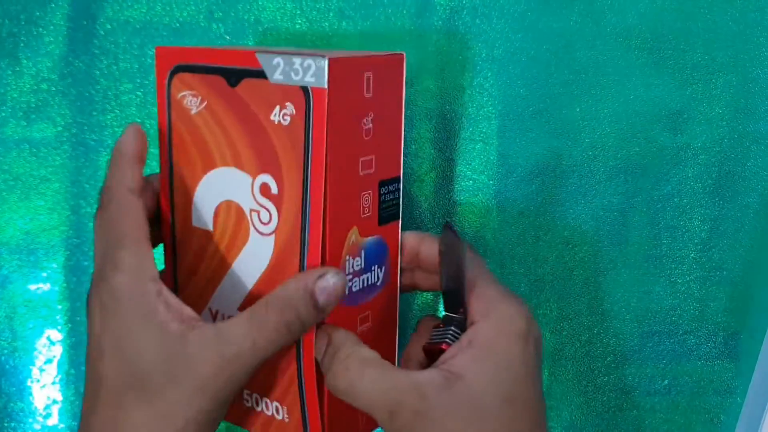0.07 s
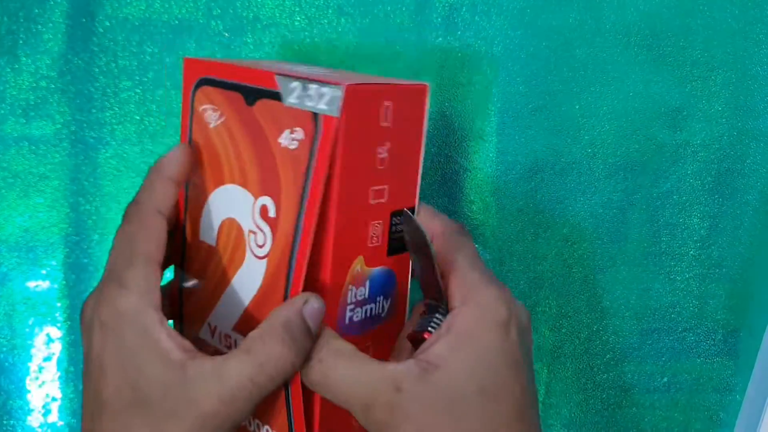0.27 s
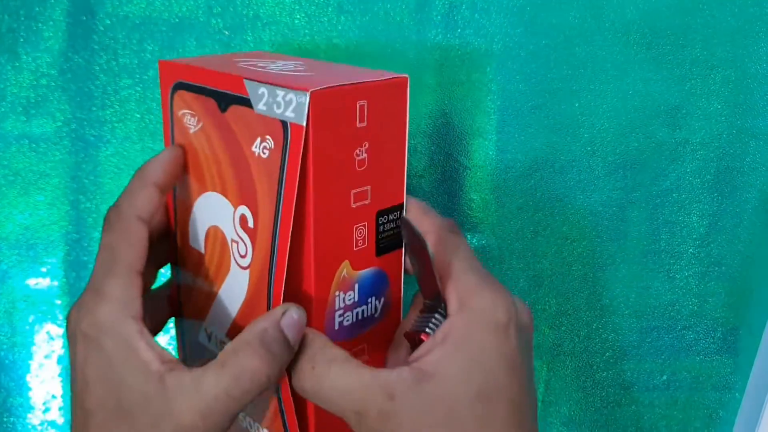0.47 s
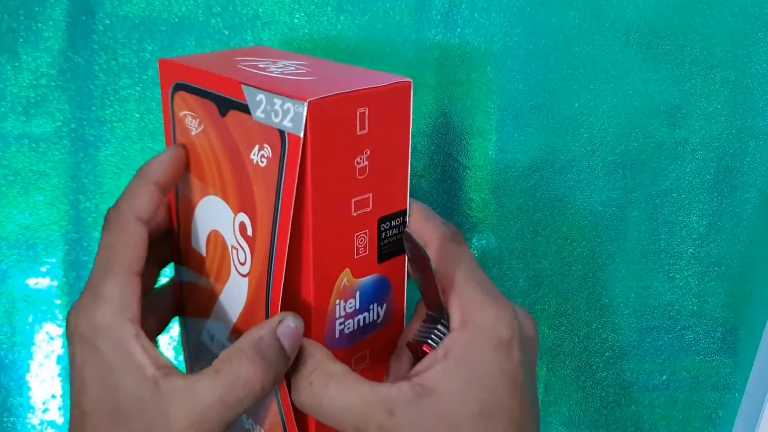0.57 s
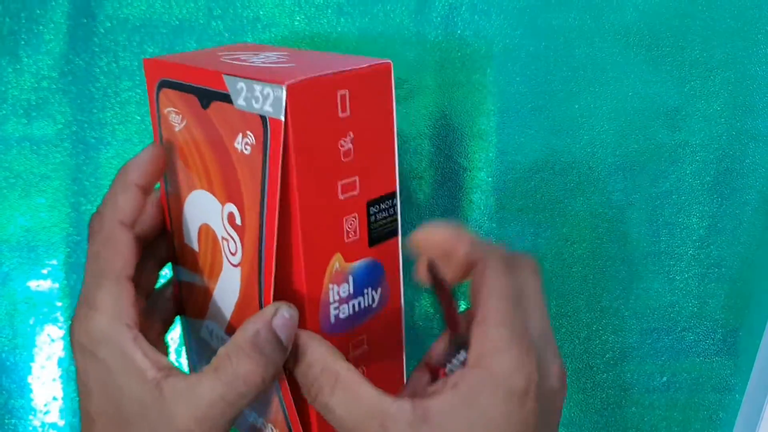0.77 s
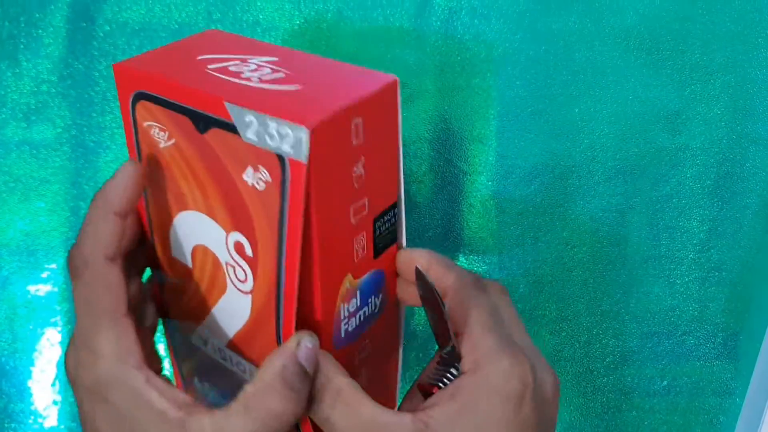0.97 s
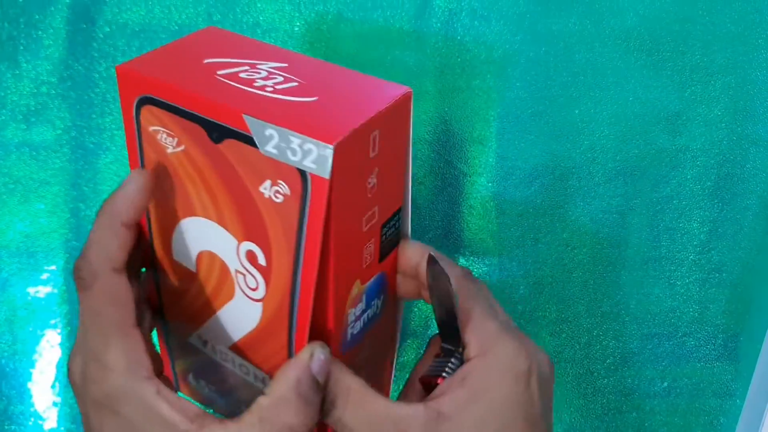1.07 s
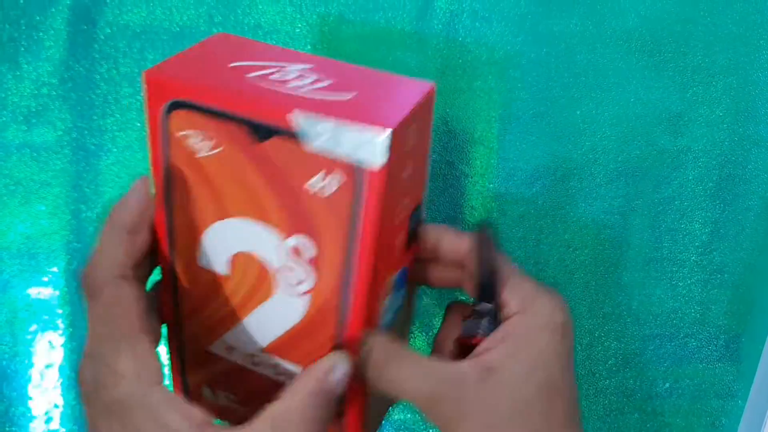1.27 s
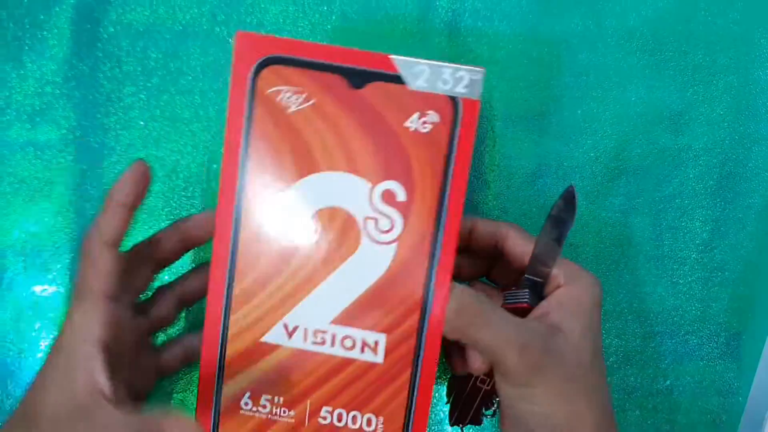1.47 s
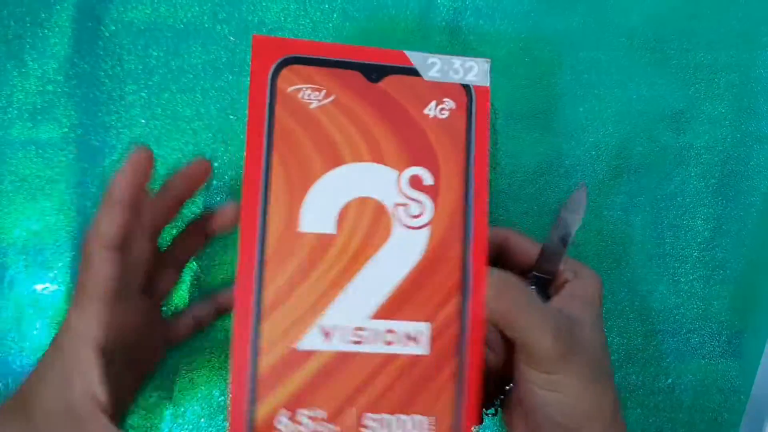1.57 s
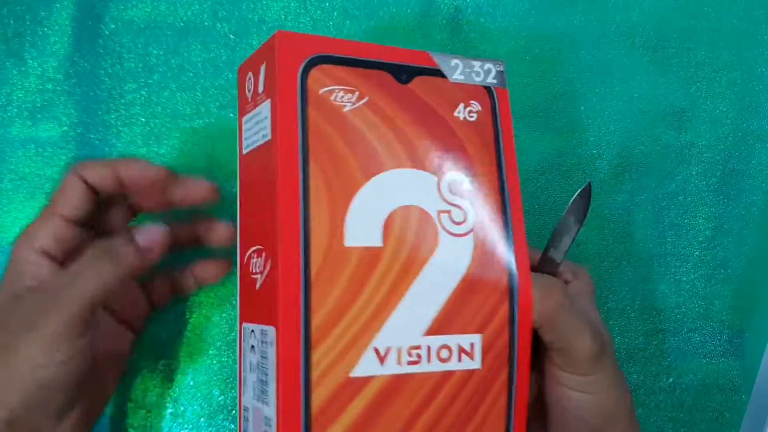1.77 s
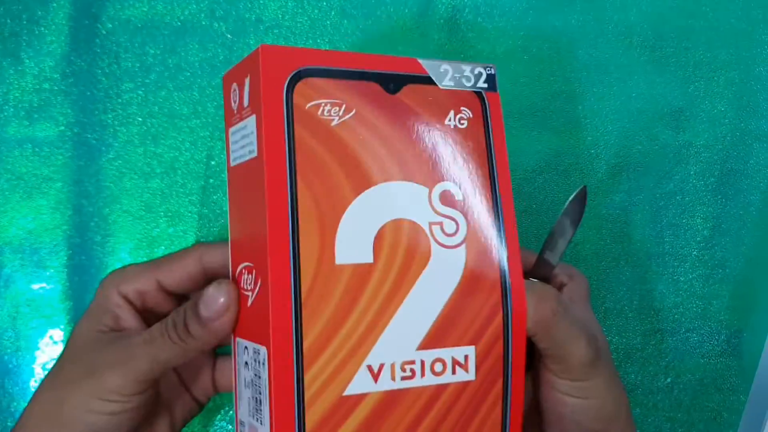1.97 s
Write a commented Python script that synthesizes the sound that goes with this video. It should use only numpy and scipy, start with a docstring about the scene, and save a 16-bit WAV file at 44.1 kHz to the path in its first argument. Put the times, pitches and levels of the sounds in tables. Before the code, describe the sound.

A light cardboard box is handled up close, with dull hollow taps, small snaps and sliding fingers

```python
"""Hands turning a glossy box

A small cardboard box is turned on a table in a quiet room, close to a phone with two microphones.
Fingers thump the hollow box: soft pushes ring its modes. Its stiff edges snap and tick: short noise
bursts with a ring. Skin slides over the coating: dense tiny slips, heard partly through the walls.
The room answers with a short diffuse tail over its own hush of steady noise.
"""
import sys
import numpy as np
from scipy import signal
from scipy.fft import rfft, irfft
from scipy.io import wavfile
from scipy.ndimage import uniform_filter1d

SR = 44100
rng = np.random.default_rng(int(sys.argv[2]) if len(sys.argv) > 2 else 0)


def boost(x):
    """Linear amplitude factor 10**(x/20) for a level x in decibels (scalar or array-like)."""
    u = np.asarray(x, float) / 20
    return 10 ** u


def materialize(psi):
    """Save the field psi as 16-bit PCM at rate SR to the path in sys.argv[1].

    A 1-D psi becomes a single channel; in a 2-D psi each row is a channel.
    """
    bounded = np.clip(np.atleast_2d(psi).T, -1, 1)
    quanta = np.round(bounded * 32767).astype(np.int16)
    wavfile.write(sys.argv[1], SR, quanta)


N = 89082
LEAD_IN_S = 0.05  # played before time 0 and cut off, so sounds may already be under way
M = N + int(LEAD_IN_S * SR)


def on_log(table, hz):
    """Reads (frequency [Hz], value) rows on a log-frequency axis."""
    table = np.array(table, float)
    return np.interp(np.log(np.maximum(hz, 1.0)), np.log(table[:, 0]), table[:, 1])


def unit(x):
    """Scales x to an rms of 1."""
    return x / np.sqrt(np.mean(x ** 2))


def band(x, hz, width_hz):
    """Resonance with gain 1 at the centre."""
    return signal.lfilter(*signal.iirpeak(min(hz, 0.45 * SR), hz / width_hz, fs=SR), x)


def band_twice(x, hz, width_hz):
    """Two equal resonances in a row, for steeper skirts."""
    return band(band(x, hz, width_hz), hz, width_hz)


def add(track, s, x):
    """Mixes x into the track at s seconds."""
    i = int((s + LEAD_IN_S) * SR)
    x = x[:M - i]
    track[i:i + len(x)] += x


def pair(a, b, likeness):
    """Mixes two spectra into a left and a right with the given likeness."""
    c = np.clip(likeness, 0, 1)
    shared, opposed = np.sqrt(1 + c) * a, np.sqrt(1 - c) * b
    return np.array([shared + opposed, shared - opposed]) / np.sqrt(2)


# Finger thumps on the box:
# (time [s], peak level at the box [dB], frequency favoured by the spot [Hz], push length [ms])
FINGER_THUMPS = [(-.012, -32, 357, 0.46), (-.004, -31, 1150, 0.076), (.013, -34, 400, 1.8),
                 (0.211, -45, 293, 0.44), (0.323, -45.5, 190, 3.2), (0.368, -40, 148, 1.74),
                 (.3915, -28, 640, 0.13), (.392, -35.5, 320, 0.45), (0.396, -42, 100, 5.4),
                 (0.437, -67, 100, 3.8), (0.454, -47.5, 100, 4.7), (0.726, -42, 290, 0.41),
                 (0.926, -35.5, 369, 0.49), (0.9265, -46, 850, 0.33), (.97, -31.5, 321, 1.3),
                 (.9705, -41, 850, .4), (0.9759, -42.5, 362, 0.67), (1.237, -42, 330, 2.86),
                 (1.33, -39, 158, 0.2), (1.33, -40, 670, 0.061), (1.642, -56, 1130, 0.21),
                 (1.759, -42, 374, 0.48), (1.998, -40.5, 290, 0.48)]
# Modes of the hollow box: (frequency [Hz], level before scatter [dB], 60 dB decay time [s])
BOX_MODES = [(88.2, 8.5, 0.11), (155, 2, 0.062), (225.2, 11.5, 0.045), (290, 4, 0.061), (349, 2.5, 0.083),
             (380, -27, 0.021), (601, -9.5, 0.27), (640, 6.5, 0.027), (850, 4.5, 0.026),
             (1094, -12.5, 0.11), (1430, -9.5, 0.11), (1497, -18, 0.47), (1807, 0.5, 0.045)]


def thumps():
    """A soft push rings the modes near in pitch to the one favoured by the spot that is hit."""
    spot_octaves, far_mode_db, scatter_db = 0.36, -21, 1.5
    sag_per_s = 0.304  # share by which the ring's pitch sinks as the wall relaxes
    build_up_cycles = 0.42  # a mode needs a moment to take up the blow
    out, t = np.zeros(M), np.arange(SR // 4) / SR
    hz, db, t60 = np.array(BOX_MODES, float).T[:, :, None]
    modes = np.sin(2 * np.pi * hz * t * (1 - sag_per_s * t / 2))
    modes = modes * 1000.0 ** (-t / t60) * (1 - np.exp(-hz * t / build_up_cycles))
    for s, peak_db, spot_hz, push_ms in FINGER_THUMPS:
        share = np.exp(-0.5 * (np.log2(hz / spot_hz) / spot_octaves) ** 2) + boost(far_mode_db)
        mode_db = db + scatter_db * rng.standard_normal(hz.shape)
        ring = (share * boost(mode_db) * modes).sum(0)
        push = np.sin(np.pi * np.clip(t[:SR // 100] * 1000 / push_ms, 0, 1)) ** 2
        blow = signal.fftconvolve(ring, -np.diff(push))  # the wall's acceleration is what radiates
        add(out, s, blow * boost(peak_db) / np.abs(blow).max())
    return out


# Snaps and ticks of the edges: (time [s], snap level before the envelope's rms [dB],
# envelope time scale [ms], tick level over the snap [dB], ring level over the snap [dB])
EDGE_SNAPS = [(-.012, -36, 27.4, -20, -12), (.295, -54.5, 8, 1, 4), (.375, -51.5, 5.3, -25, -20),
              (.3915, -41.5, 3.5, -1.5, 0), (0.43, -64.5, 4.6, 13, -26), (0.727, -64, 14, -9, -14),
              (0.969, -56, 6.2, -7, 4), (1.008, -66, 5.7, 17.5, -11), (1.153, -66, 2.8, 10, -5),
              (1.218, -62.5, 9, -8, -3), (1.233, -57, 24, -37, 4), (1.244, -52.5, 16.7, 2, -3),
              (1.325, -38.5, 20.8, -6, -0.5), (1.408, -69, 13, -25, 16.5), (1.982, -62, 16.1, -20, 11.5),
              (2, -64, 2.16, -36, 20)]
# Resonances that ring after a snap: (frequency [Hz], width of one filter pass [Hz], level within the ring [dB])
RING_MODES = [(2169, 310, 1.5), (1807, 97, -10), (3200, 760, -36)]


def snap_ring(jolt, burst):
    """A ring set off by one jolt, with a noisy rasp 5 dB below it."""
    ring = 0
    for hz, width_hz, db in RING_MODES:
        clean = unit(band_twice(jolt, hz, width_hz))
        rasp = boost(-5) * unit(band(burst, hz, width_hz))
        ring = ring + boost(db) * (clean + rasp)
    return ring


def snaps():
    """A short noise burst gives a broad snap and a treble tick; a jolt in it sets off a ring."""
    out, t = np.zeros(M), np.arange(SR // 20) / SR
    for s, db, ms, tick_db, ring_db in EDGE_SNAPS:
        u = t * 1000 / ms
        shape = u ** 2 * np.exp(-5.5 * u)
        shape = shape / shape.max()
        burst = rng.standard_normal(len(t)) * shape
        jolt = np.zeros(len(t))
        jolt[np.argmax(shape) // 2] = 1  # halfway up to the burst's peak
        snap = unit(band(burst, 2310, 5400))  # centre and width in Hz
        tick = unit(band_twice(burst, 10800, 9000))
        parts = snap + boost(tick_db) * tick + boost(ring_db) * snap_ring(jolt, burst)
        add(out, s, boost(db) * np.sqrt(np.mean(shape ** 2)) * parts)
    return out


# Skin sliding on the coating: (middle [s], length [s], level before the swell [dB],
# centre frequency [Hz], level through the box walls over the direct slide [dB])
SKIN_SLIDES = [(.0, 0.46, -63, 3400, 16.5), (0.214, 0.11, -69, 7740, 8.5), (0.299, 0.13, -56.5, 6900, 1.5),
               (0.411, 0.3, -70.5, 6200, 13), (0.769, 0.12, -60, 10500, -0.5),
               (0.986, 0.19, -64.5, 5000, 9), (1.058, 0.1, -70, 8500, 13), (1.123, 0.11, -62.5, 4530, 5.5),
               (1.248, 0.15, -72, 7200, 15.5), (1.364, 0.18, -77.5, 3200, 27),
               (1.719, 0.16, -72, 4900, -23), (2.015, 0.095, -69.5, 4350, 18)]


def slip_grains():
    """Sparse random clicks of uneven strength, under a grip that wavers."""
    grains_per_s, spread_db = 6000, 2.2
    grip_per_s, grip_db = 120, 1.8  # uneven grip of the sliding skin
    clicks = (rng.random(M) < grains_per_s / SR) * rng.standard_normal(M)
    clicks = clicks * boost(spread_db * rng.exponential(1, M))
    hold = int(SR / grip_per_s)
    steps = np.repeat(rng.standard_normal(M // hold + 2), hold)[:M]
    grip = uniform_filter1d(steps, hold // 2)
    return unit(clicks * boost(grip_db * grip))


def slides():
    """Dense tiny slips swell and fade; part of them sounds through the box walls."""
    out, t = np.zeros(M), np.arange(M) / SR - LEAD_IN_S
    grains = slip_grains()
    walls = unit(band(grains, 237, 600) + 0.26 * band(grains, 1880, 1770))
    for s, length, db, hz, wall_db in SKIN_SLIDES:
        swell = np.cos(np.pi * np.clip((t - s) / length, -0.5, 0.5)) ** 2
        skin = unit(band_twice(grains, hz, 1.3 * hz))
        out += swell * boost(db) * (skin + boost(wall_db) * walls)
    return out


# Likeness of the room's sound at the two microphones, also used by the hush:
# (frequency [Hz], likeness [0-1])
MICROPHONE_LIKENESS = [(60, 0.88), (300, 0.94), (700, 0.26), (1500, 0), (3000, 0)]
# Tail of the quiet room: (frequency [Hz], 60 dB decay time [s], level [dB])
ROOM_TAIL = [(100, 0.12, 3), (520, 0.54, -5), (920, 0.39, -2.5), (2260, 0.3, -1), (5000, 0.53, -14),
             (12000, 0.26, 3.5)]


def noise_pair(length, f):
    """Spectra of white noise at both microphones, as alike as the table says."""
    a, b = rfft(rng.standard_normal(length)), rfft(rng.standard_normal(length))
    return pair(a, b, on_log(MICROPHONE_LIKENESS, f))


def room(x):
    """A diffuse tail of noise, each octave band dying at its own rate."""
    rise_s = 0.00067
    t, f = np.arange(SR) / SR, np.fft.rfftfreq(SR, 1 / SR)
    noise, tail = noise_pair(SR, f), 0
    levels = np.array(ROOM_TAIL)[:, ::2]
    for hz in 60 * 2.0 ** np.arange(9):
        share = np.clip(1 - np.abs(np.log2(np.maximum(f, 1.0) / hz)), 0, 1)
        fade = 1000.0 ** (-t / on_log(ROOM_TAIL, hz)) * (1 - np.exp(-t / rise_s))
        fade = fade / np.sqrt(np.sum(fade ** 2))
        tail = tail + boost(on_log(levels, hz)) * irfft(noise * share, SR) * fade
    return signal.fftconvolve(x[None], tail, axes=1)[:, :M]


# Colour of the steady hush: (frequency [Hz], relative density [dB per Hz])
HUSH_COLOUR = [(25, -46), (45, 6), (65, 1), (122, -6), (210, -5.5), (344, -12.5), (511, -15), (760, -22),
               (1410, -25), (2500, -28), (3100, -35), (4730, -41.5), (15500, -35.5)]
# Mid band of the hush: (time [s], level [dB])
MID_HUSH_LEVEL = [(0, -67), (0.599, -69), (1.2, -64), (1.6, -71.5), (2.02, -94)]


def hush(f):
    """Steady room noise, much alike at both microphones in the bass; its mid band wavers, then sinks."""
    low_hz, high_hz = 1030, 2480  # edges of the mid band
    steady = irfft(noise_pair(M, f) * boost(on_log(HUSH_COLOUR, f)), M)
    mid_gain = 1 / np.sqrt((1 + (low_hz / (f + 1)) ** 4) * (1 + (f / high_hz) ** 16))
    mid = irfft(noise_pair(M, f) * mid_gain, M)
    mid_db = np.interp(np.arange(M) / SR - LEAD_IN_S, *np.array(MID_HUSH_LEVEL).T)
    return boost(-58) * unit(steady) + boost(mid_db) * unit(mid)


# Left microphone over right for sound straight from the box: (frequency [Hz], level difference [dB])
LEFT_RIGHT_BALANCE = [(60, -1), (350, -6.5), (700, 1), (1400, -11), (2800, -2), (5500, 8), (11000, 18)]


def scene():
    """Box, room and hush at two microphones: the left hears earlier and with more treble."""
    right_lag_s = 0.00026
    f = np.fft.rfftfreq(M, 1 / SR)
    box = thumps() + snaps() + slides()
    half_db = on_log(LEFT_RIGHT_BALANCE, f) / 2
    lag = np.array([np.ones(len(f)), np.exp(-2j * np.pi * f * right_lag_s)])
    direct = irfft(rfft(box) * boost([half_db, -half_db]) * lag, M)
    # the diffuse sound differs less between the microphones
    diffuse_gain = boost([0.44 * half_db, -0.4 * half_db])
    diffuse = irfft(rfft(room(box) + hush(f)) * diffuse_gain * lag, M)
    return (direct + diffuse)[:, M - N:]


def top_cut(x):
    """Nothing passes above the cut-off."""
    return signal.sosfilt(signal.butter(12, 15940, fs=SR, output="sos"), x)


# Treble response of both microphones: (frequency [Hz], gain [dB])
MICROPHONE_COLOUR = [(5500, 0), (7400, -11), (10500, -10), (13500, -14.5), (15700, -21)]


def record(dry):
    """Both microphones take away treble by the same response."""
    gain = boost(on_log(MICROPHONE_COLOUR, np.fft.rfftfreq(N, 1 / SR)))
    mix = irfft(rfft(dry) * gain, N)
    return top_cut(mix)


dry = scene()
out = record(dry)
materialize(out)
```